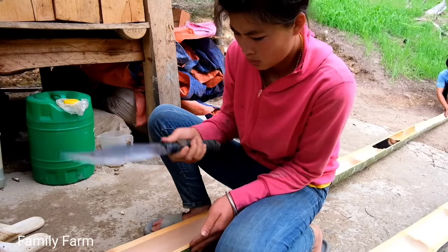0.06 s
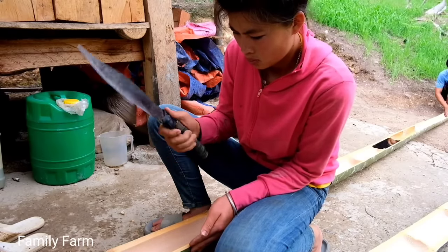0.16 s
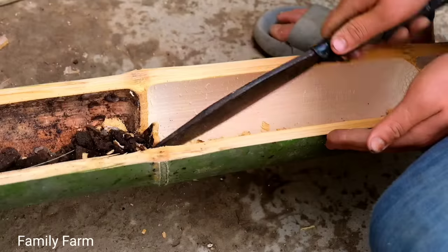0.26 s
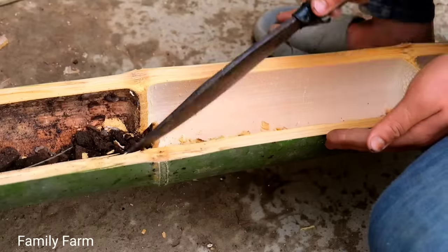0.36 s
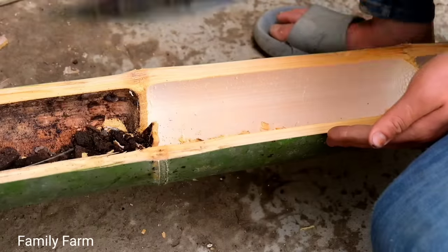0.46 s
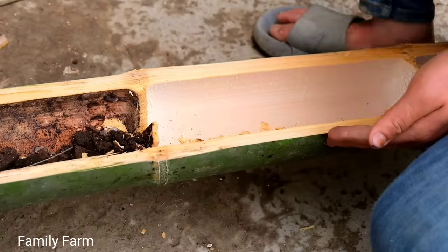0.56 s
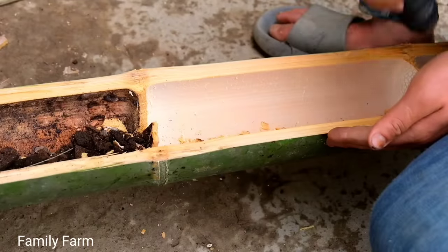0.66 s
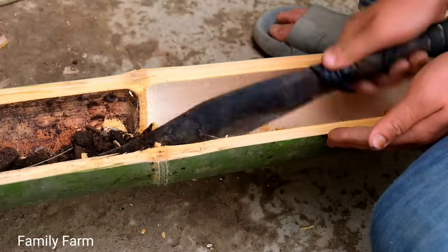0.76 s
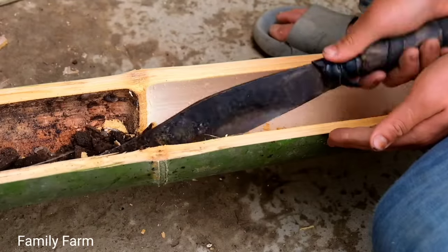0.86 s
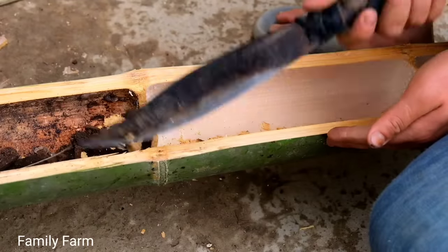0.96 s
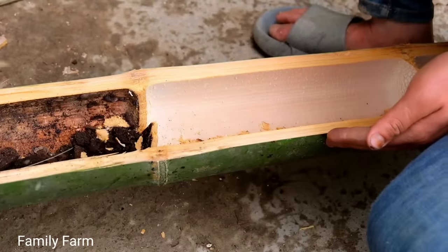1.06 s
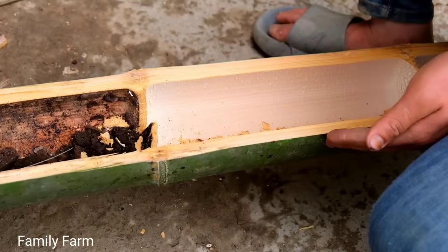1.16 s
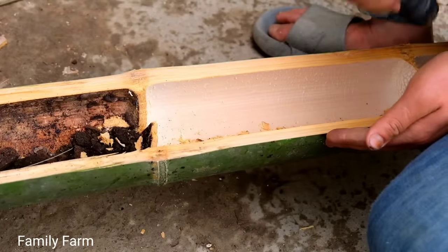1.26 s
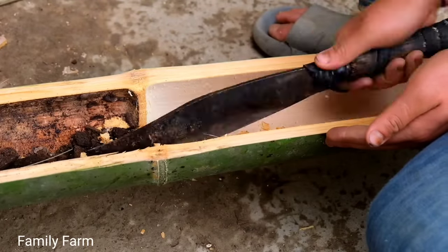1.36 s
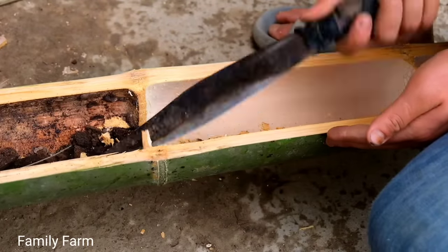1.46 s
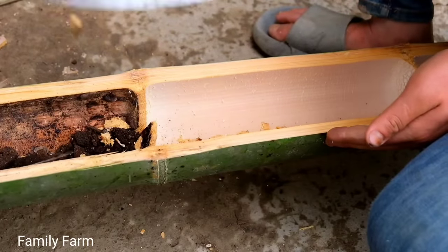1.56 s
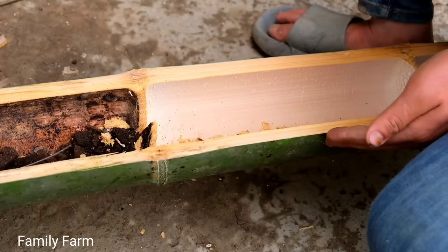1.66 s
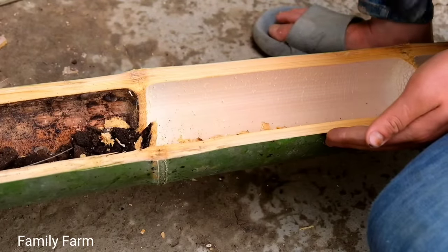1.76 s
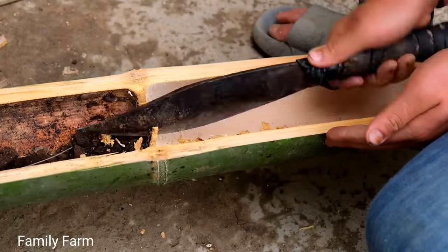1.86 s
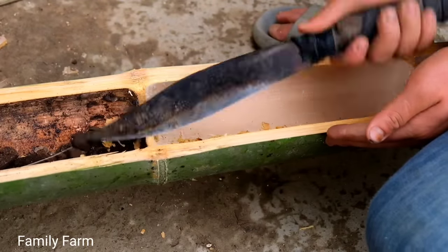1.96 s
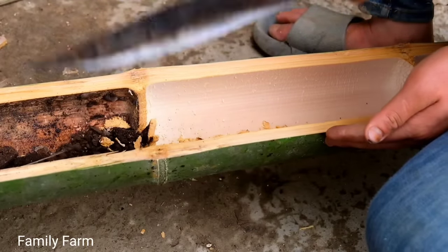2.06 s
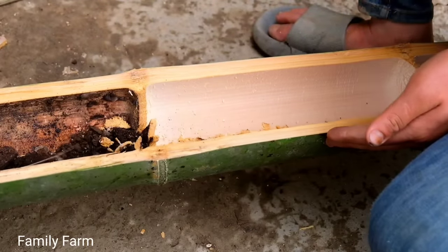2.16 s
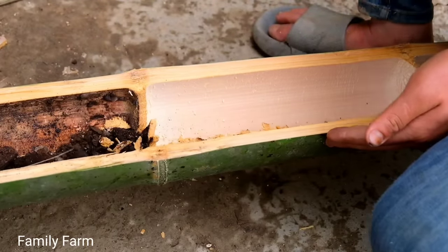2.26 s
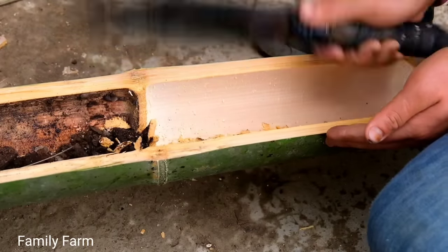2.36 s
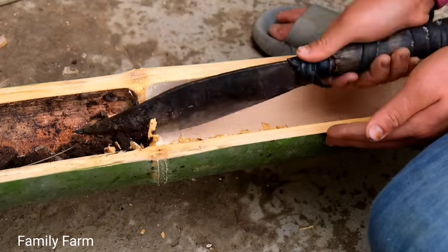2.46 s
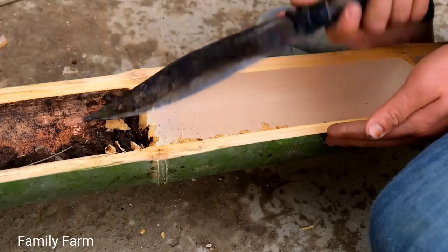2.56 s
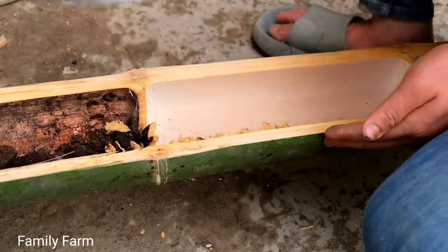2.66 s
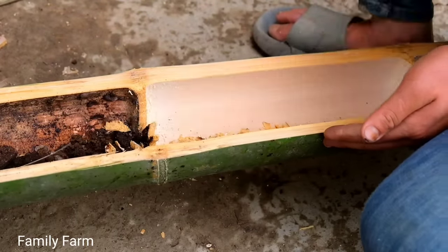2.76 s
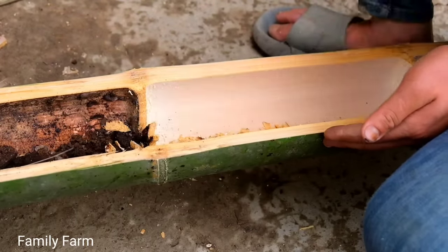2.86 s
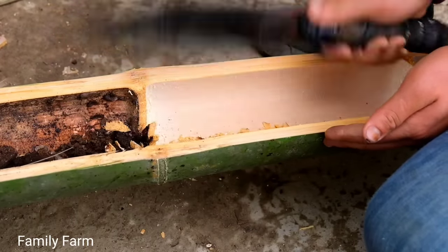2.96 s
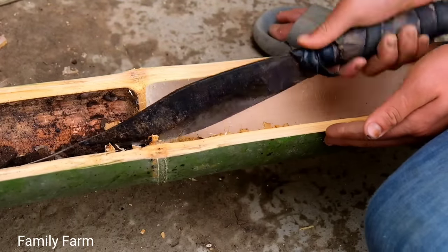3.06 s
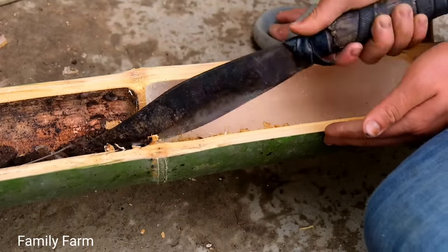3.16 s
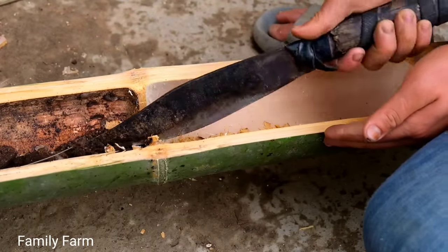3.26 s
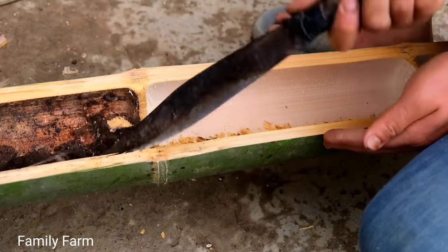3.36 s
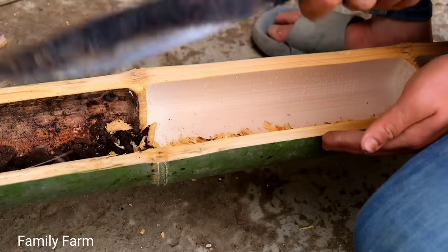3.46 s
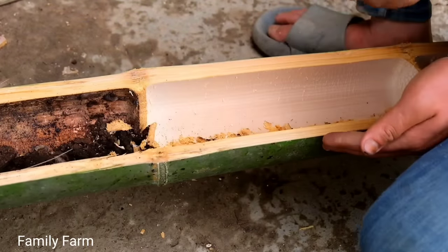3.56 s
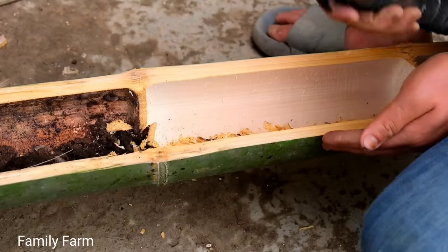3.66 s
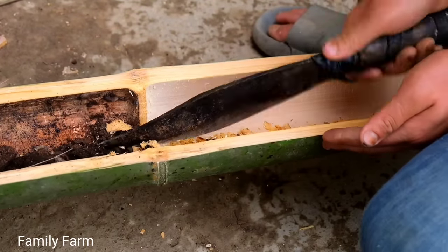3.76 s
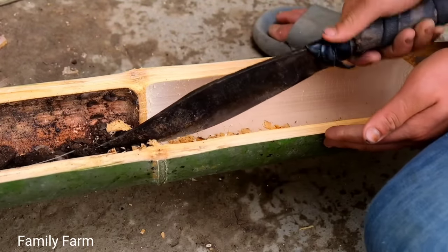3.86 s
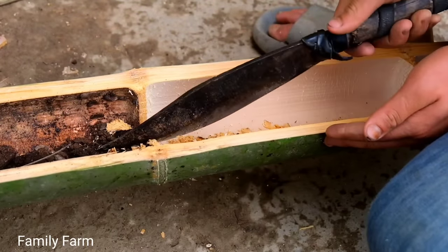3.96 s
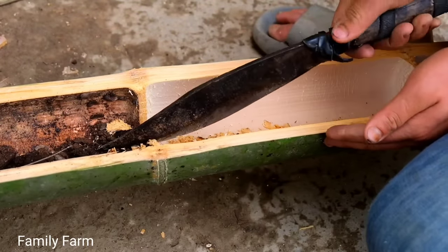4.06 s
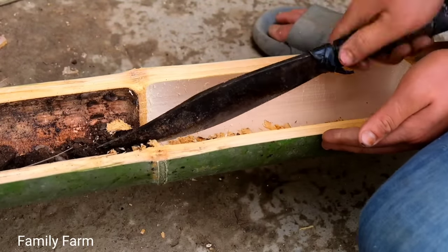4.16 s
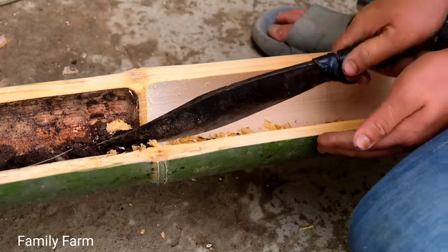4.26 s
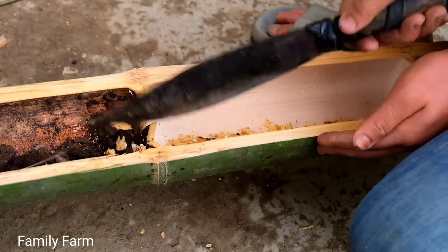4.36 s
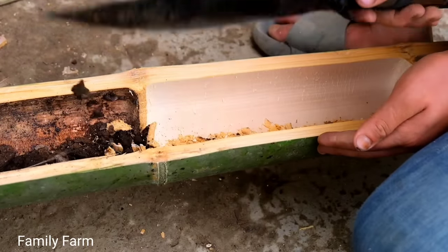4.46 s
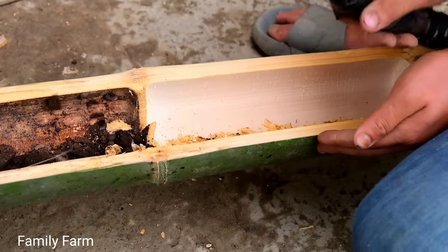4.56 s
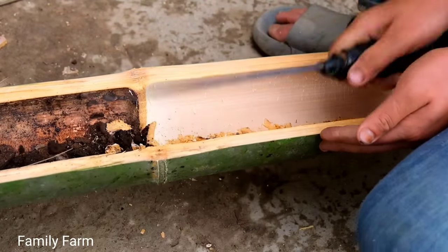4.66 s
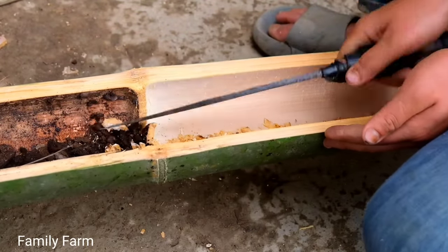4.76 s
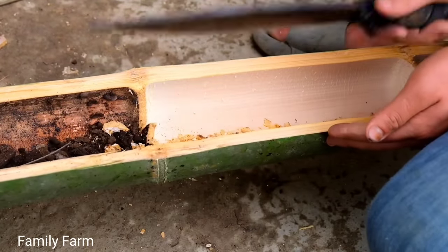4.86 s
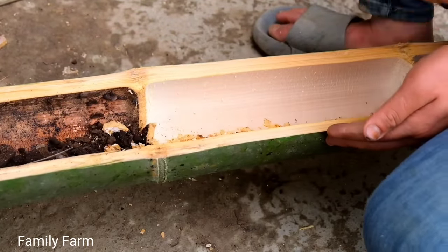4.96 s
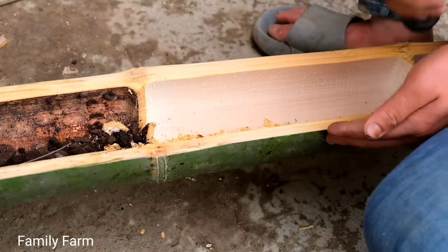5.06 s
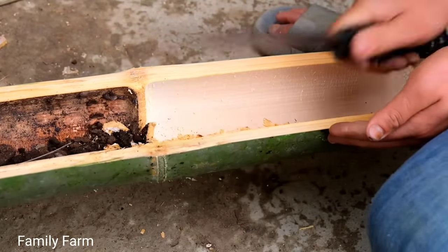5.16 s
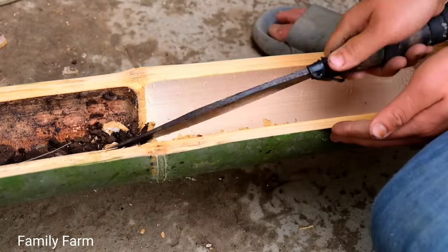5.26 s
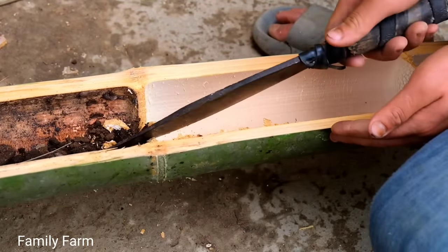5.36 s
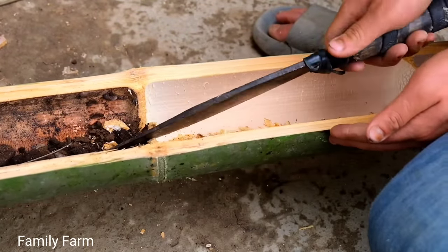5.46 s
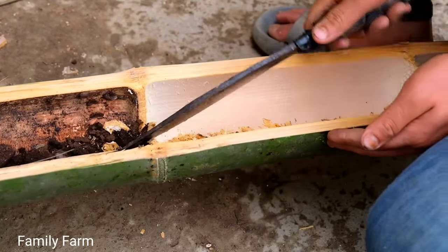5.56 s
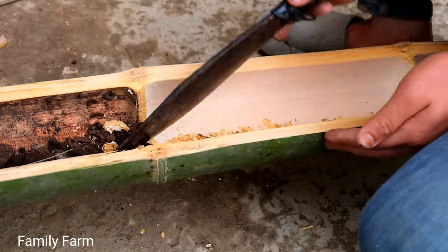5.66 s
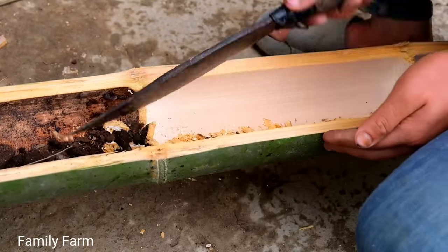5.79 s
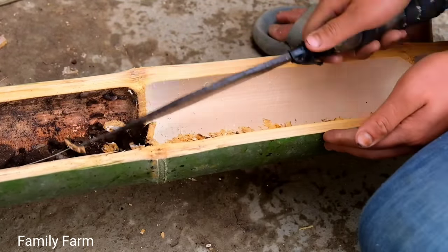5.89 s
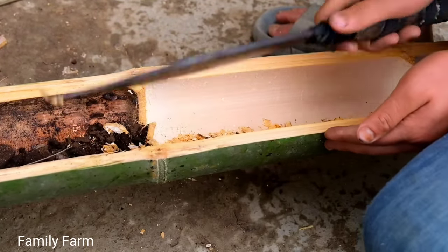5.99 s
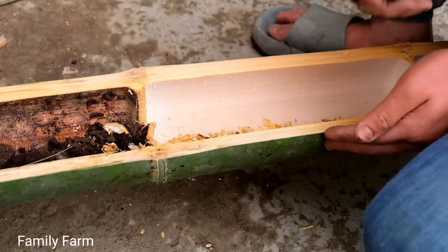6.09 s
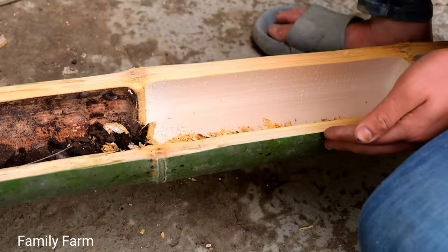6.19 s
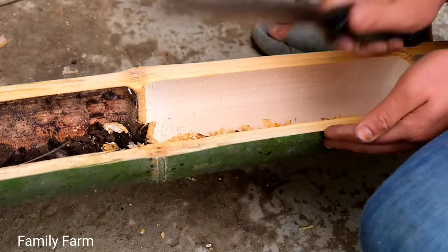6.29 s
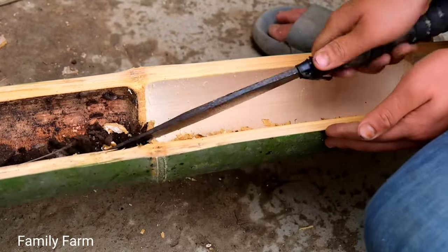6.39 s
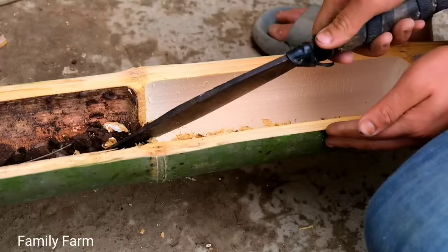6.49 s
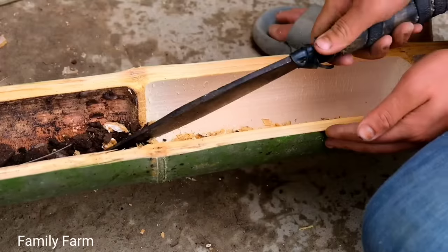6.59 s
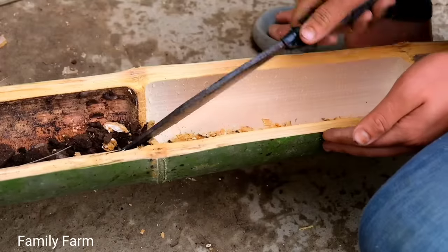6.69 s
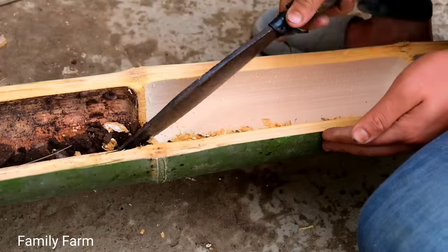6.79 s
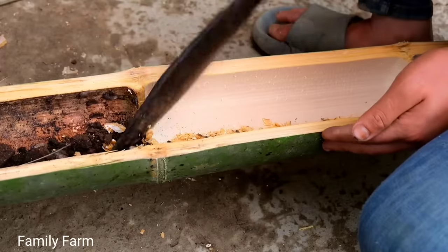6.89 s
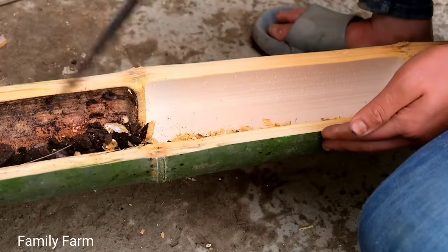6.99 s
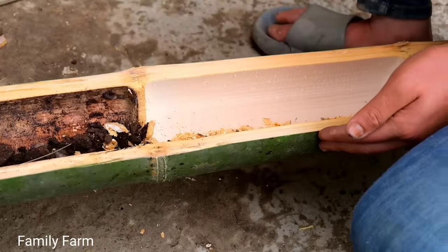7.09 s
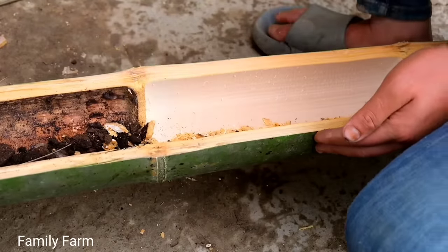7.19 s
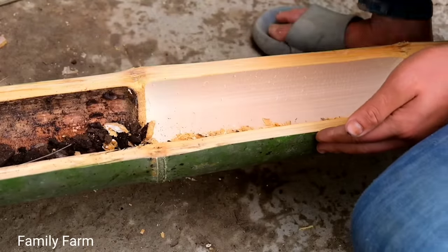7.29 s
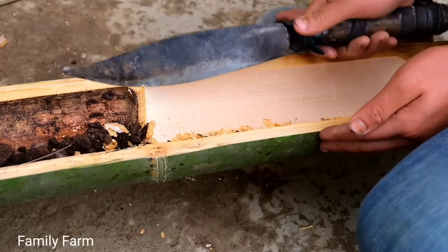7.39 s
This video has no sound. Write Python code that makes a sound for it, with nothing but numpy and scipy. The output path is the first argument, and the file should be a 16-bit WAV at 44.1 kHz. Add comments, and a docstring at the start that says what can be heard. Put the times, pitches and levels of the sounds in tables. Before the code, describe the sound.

Close microphone in an open concrete yard: insect hiss and soft air, a short scrape, then sharp bamboo chops with crisp fibre cracks, a low ground thud and slight steel ring. A second knife hacks farther away, crunchier and duller, with a short echo. Light ticks, hollow taps and rasps fill the gaps. A hoarse little bird run comes after four seconds, then chopping continues more sparsely.

```python
"""Insects hiss in open air from the start; the level begins low and quickly recovers.
A blade scrapes in a bamboo trough, then a second knife farther off hacks at its own pace.
Soon a heavy knife chops a bamboo pole on a concrete yard, loud enough to overload the microphone;
chips patter after each chop and the blade taps between them. Later a small bird gives a run of chirps.
Knocks are dying tones, cracks and hisses are shaped noise; gain control ducks the sound after each blow."""
import sys
import numpy as np
from scipy import signal
from scipy.fft import rfft, irfft
from scipy.io import wavfile
from scipy.ndimage import uniform_filter1d, map_coordinates

SR = 44100
rng = np.random.default_rng(int(sys.argv[2]) if len(sys.argv) > 2 else 0)


def pcm_store(signal):
    """Save signal as 16-bit PCM."""
    levels = np.round(np.clip(np.atleast_2d(signal), -1, 1) * 32767)
    wavfile.write(sys.argv[1], SR, levels.astype(np.int16).T)


N = 327663
T = np.arange(SR // 3) / SR  # time within one blow, in seconds

# All event and mode levels below are relative: each layer adds its own gain.
# Near chops: start_s, force_db, bite_db (into hard fibre), thud_db (on the ground),
# hollow_db (of the trough), knock_hz, crack_hz
NEAR_CHOPS = [(0.8071, -18.5, 4, -2.5, 3, 716, 2030), (1.383, -18.5, 3, -16, 4, 743, 2167),
              (1.897, -19.5, 9, -2, -11, 762, 1431), (2.449, -15.5, 0.5, -0.5, 5.5, 767, 1273),
              (3.0329, -13, -1, -7, -2, 772, 2184), (3.8131, -15, -11, -2, -2.5, 865, 1860),
              (4.7517, -31.5, -3, -3, 6, 780, 1230), (5.245, -15, -2, -2, -2.5, 925, 1500),
              (6.388, -16, -3.5, -2.5, 0, 876, 1670)]
# Second knife: start_s, force_db, bite_db, knock_hz
FAR_CHOPS = [(0.36, -25, -1, 529), (0.835, -31, 7.5, 654), (1.527, -24, -5, 557), (2.116, -21.5, -1.5, 573),
             (2.651, -25.5, 0, 723), (3.273, -27.5, 4, 730), (3.854, -26.5, -3, 726),
             (4.323, -23.5, -12, 753), (4.789, -25.5, -19, 690), (5.509, -25.5, -11, 688),
             (6.252, -28, 1.5, 537), (6.895, -25, 2.5, 947)]
# Light touches and bounces of the blade: start_s, force_db, hardness_db, knock_hz, free_ring (0 to 1)
BLADE_TAPS = [(0.974, -50, -5.5, 680, 0), (1.1263, -46.5, -14, 845, 0.23), (1.465, -54.5, 9.5, 430, 0.07),
              (1.978, -54.5, 7.5, 710, 0.8), (1.997, -41, -2.5, 1455, 0.04), (2.588, -33.5, -6, 450, 0.4),
              (2.601, -36, -2, 426, 0.82), (2.906, -62, -21.5, 473, .1), (3.367, -45, 3.5, 625, 0.45),
              (3.4264, -33.5, -9.5, 434, .06), (4.761, -30, -11.5, 875, 0.1), (4.935, -48, -12, 708, .1),
              (5.095, -55.5, -10.5, 704, .1), (5.676, -47.5, -4.5, 622, .7), (5.893, -35, -9, 447, .9),
              (5.978, -34.5, -8.5, 431, .01), (6.532, -39.5, -6, 974, 0), (6.731, -47.5, -1.5, 870, .25),
              (6.795, -55.5, 2.5, 960, 0.44), (7.042, -34, 1.5, 433, 0.14)]
# Blade dragged along the trough, and last a short knock at 6.55 s: peak_s (hardest pressure), swell_s, fade_s,
# pressure_db, rasp_db
SCRAPE_STROKES = [(0.281, 0.043, 0.021, -37, -45), (0.342, 0.032, 0.019, -40.5, -9),
                  (2.592, .018, 0.026, -24.5, -2.5), (4.94, 0.057, .06, -33.5, -6),
                  (5.664, 0.021, 0.052, -43, -3), (5.78, .08, 0.14, -53.5, 11.5),
                  (5.84, .1, .08, -33.5, -13), (6.382, .04, .005, -31.5, -10),
                  (6.552, 0.034, 0.038, -37, -15)]

# Ringing modes, all with columns: pitch_hz, level_db, t60_s (time to fall by 60 dB)
# Lasting ring of the bamboo pole
POLE_MODES = [(437.3, 0, 0.09), (540, -0.5, 0.046), (712, -4, 0.2), (877, -9, 0.0884), (1026, -13, 0.17),
              (1140, -15, 0.061), (1240, -9, 0.2), (1360, -15.5, .08), (1750, -9.5, 0.17),
              (2140, -17, 0.061), (2900, -19, 0.25), (3700, -18.5, .09), (5130, -17, 0.089)]
# Lasting ring of the steel blade
BLADE_MODES = [(9232, -20, .08), (11042, 0, .12), (11070, -21, .3), (13700, -10, .08), (13790, -16, .12),
               (15500, -20, .07)]
# The trough's short first answer to a hard blow
TROUGH_MODES = [(431.2, -10, 0.082), (563, 1, 0.034)]
# Quickly damped modes of the edge and of the stiff fibres it enters
FIBRE_MODES = [(2934, -4, 0.025), (3710, -5.5, .02), (4630, -0.5, 0.024), (5205, -1.5, 0.029),
               (6530, -6.5, 0.014), (8700, -7.5, 0.012), (9100, -3.5, 0.017), (11130, 2.5, 0.017),
               (11350, -4.5, .02), (13400, -3, 0.016)]

# Noise colours, all with columns: pitch_hz, level_db (per Hz, relative)
# Hollow body of the bamboo
BODY_COLOUR = [(30, -52.5), (100, -27), (160, -7), (280, -18.5), (430, 1.5), (700, 3.5), (950, -0.5),
               (1250, -5.5), (2500, -51.5)]
# Cracking fibres
CRACK_COLOUR = [(500, -26), (1000, -11.5), (1300, -4), (2100, 1.5), (2400, -3), (3100, -5), (4000, -16.5),
                (7000, -45.5)]
# Bright splinters
SPLINTER_COLOUR = [(2000, -13), (3800, 1), (5100, 7), (7000, -4.5), (9000, -5), (12000, -8.5),
                   (15500, -12.5)]
# Crumbs, ticks and fine grit
GRIT_COLOUR = [(2000, -9), (3800, -1), (5500, -5), (8000, -8), (11000, -17.5), (14500, -21.5), (16000, -29)]
# Edge rasping over fibres
RASP_COLOUR = [(900, -14), (1800, -2.5), (3300, -4), (6000, -7), (9000, -10), (14000, -15), (16000, -35)]
# Pole thudding on the ground
THUD_COLOUR = [(60, -44.5), (140, -17.5), (220, -4), (310, -1), (400, -4.5), (600, -37)]
# Dull body of the far pole
DULL_COLOUR = [(30, -53), (100, -42.5), (150, -11), (220, -16), (320, -13), (430, -5.5), (540, -1.5),
               (700, -8), (950, -6.5), (1250, -12), (2500, -59)]
# Bamboo wall where it is hit
WALL_COLOUR = [(400, -34), (620, 2), (720, 2), (830, -2), (980, -2), (1150, -4), (1600, -39)]
# Open country air
AIR_COLOUR = [(20, -34.5), (60, -3), (120, -6), (250, -3.5), (450, 0.5), (1000, -1), (1600, -5.5),
              (2300, -6.5), (3300, -11.5), (5000, -39.5)]
# Insect chorus
INSECT_COLOUR = [(1760, -33), (3000, -15.5), (3680, -12), (4630, -4), (5180, -5), (5800, -1.5), (6570, -6),
                 (7560, 0.5), (8400, -5.5), (8760, -15), (10400, -15), (11500, -25), (14500, -23),
                 (15300, -33), (16000, -41.5)]

# How alike left and right are: pitch_hz, likeness (1 = the same)
LEFT_RIGHT_LIKENESS = [(60, 1), (400, 1), (700, 0.99), (1300, 0.78), (2400, 0.63), (4400, 0.048),
                       (15000, 0.28)]
# How long the yard echoes: pitch_hz, t60_s
YARD_DECAY = [(150, 0.1), (500, 0.2), (1000, .26), (2500, 0.26), (6000, 0.47), (14000, 0.12)]

# A deeper bite cracks more and rings the steel more (dB per dB of bite)
CRACK_PER_BITE, STEEL_PER_BITE, FAR_CRACK_PER_BITE = 0.45, 2.2, 0.14
# A blow that does not drive the pole into the ground springs off and rings more (dB per dB of thud)
STEEL_PER_THUD = -0.31
# A far spot that knocks higher is stiffer and has less body
MID_KNOCK_HZ, BODY_DB_PER_OCTAVE = 690, -3
CRUNCH_LEAD_S = 0.007  # the far crunch comes this long before its knock
SCRAPE_RANGE_DB = 21.5  # a stroke begins and ends this far under its peak
CHIRP_START_S, CHIRP_EVERY_S, CHIRP_COUNT, CHIRP_DB = 4.011, 0.086, 8, -52.5
EDGE_HZ = 16200  # top of the final sound band


def amp(db):
    """Turns decibels into a gain."""
    return 10 ** (np.asarray(db) / 20)


def unit(x):
    """Scales a signal to rms 1."""
    return x / np.sqrt(np.mean(x ** 2) + 1e-20)


def read(points, hz):
    """Reads between table points on a logarithmic pitch axis."""
    table_hz, value = np.transpose(points)
    return np.interp(np.log(hz + 1), np.log(table_hz + 1), value)


def add(mix, start_s, sound):
    """Lays a stereo sound into the mix, cut off at the end if need be."""
    part = mix[:, max(round(start_s * SR), 0):][:, :sound.shape[1]]
    part += sound[:, :part.shape[1]]


def port_angle(hz):
    """Half the phase angle between the two microphone ports."""
    return np.arccos(np.clip(read(LEFT_RIGHT_LIKENESS, hz), -1, 1)) / 2


def noise(colour, size, ripple_db=0, ripple_hz=260):
    """Coloured stereo noise of rms 1, mono in the bass, wide in the treble; ripple adds chance resonances."""
    hz = np.fft.rfftfreq(size, 1 / SR)
    ripple = map_coordinates(rng.standard_normal(400), [hz / ripple_hz], order=2, mode="wrap")
    gain = amp(read(colour, hz) + ripple_db * ripple)
    mid, side = rfft(rng.standard_normal((2, size))) * gain
    mid = mid * np.cos(port_angle(hz))
    side = side * np.sin(port_angle(hz))
    return unit(irfft([mid + side, mid - side], size))


def wander(per_s, size):
    """A smooth random curve of rms 1, with per_s random points each second."""
    knots = np.arange(size) * per_s / SR
    return unit(map_coordinates(rng.standard_normal(size // 20), [knots], order=2, mode="wrap"))


def burst(rise, t60, hold=0):
    """Loudness curve of a blow: it swells, holds, then dies away (all times in seconds)."""
    swell = 1 - np.exp(-T / rise)
    return swell * 1000 ** (-np.maximum(T - hold, 0) / t60)


def mode(hz, t60, rise=0.0027):
    """One damped vibration, its phase shifted in opposite ways at the two ports."""
    phase = np.array([[-1], [1]]) * port_angle(hz)
    return np.sin(2 * np.pi * hz * T + phase) * burst(rise, t60)


def ring(modes, rise=0.0021):
    """All modes of an object struck at once; where the blow lands decides how much each one gets."""
    place_db = 1.8 * rng.standard_normal(len(modes))
    out = np.zeros((2, len(T)))
    for (hz, level_db, t60), extra_db in zip(modes, place_db):
        out += amp(level_db + extra_db) * mode(hz, t60, rise)
    return out


def splintering(colour, rough_db, per_s):
    """Fibres give way bundle after bundle; every spot on the pole has its own resonances."""
    fibres = noise(colour, len(T), ripple_db=4)
    return fibres * unit(amp(rough_db * wander(per_s, len(T))))


def dulled(x, corner_hz):
    """A gentle loss of treble."""
    return signal.lfilter(*signal.butter(1, corner_hz, fs=SR), x)


def thinned(x, corner_hz):
    """Takes away the deepest bass."""
    return signal.sosfilt(signal.butter(2, corner_hz, "high", fs=SR, output="sos"), x)


def patchy(x, depth_db):
    """Narrow pitch bands swell and fade on their own."""
    bands = signal.stft(x, nperseg=1024)[2]
    patches = rng.standard_normal(bands.shape[1:])
    patches = uniform_filter1d(patches, size=7, axis=0)  # smooth over pitch
    patches = uniform_filter1d(patches, size=8, axis=1)  # smooth over time
    return signal.istft(bands * amp(depth_db * unit(patches)), nperseg=1024)[1][:, :N]


def background():
    """Open country air and an insect chorus, both noise that wavers in level."""
    air = amp(-53 + 0.58 * wander(per_s=9.4, size=N)) * noise(AIR_COLOUR, N)
    insects = amp(-54.5 + 2.2 * wander(per_s=14, size=N)) * noise(INSECT_COLOUR, N)
    return patchy(air + insects, depth_db=4)


def scrapes():
    """The tip sticks and slips under changing pressure; crumbs knock in the trough while the edge rasps."""
    out = np.zeros((2, N))
    for peak_s, swell, fade, pressure_db, rasp_db in SCRAPE_STROKES:
        t = np.arange(-round(swell * SR), round(fade * SR)) / SR
        size = len(t)
        drop_db = SCRAPE_RANGE_DB * np.maximum(-t / swell, t / fade)
        pressure = amp(pressure_db - drop_db) * signal.windows.tukey(size, 0.2)  # soft ends
        crumbs = unit(amp(3.8 * wander(per_s=150, size=size)))
        slips = unit(amp(2.4 * wander(per_s=740, size=size)))
        rumble = noise(BODY_COLOUR, size)
        rumble += amp(-2.5 + 0.35 * rasp_db) * noise(CRACK_COLOUR, size, ripple_db=3)
        rasp = amp(rasp_db + 2.5) * noise(RASP_COLOUR, size)
        add(out, peak_s - swell, pressure * (crumbs * rumble + slips * dulled(rasp, corner_hz=9060)))
    return out


def yard(x, delay=0.006, build=0.0045):
    """Scattered echoes from the shed and the ground, as fading noise with its own decay at each pitch."""
    flat = [(20, 0), (20000, 0)]
    hz, t, bands = signal.stft(noise(flat, SR // 2), SR, nperseg=256)
    fading = amp(-60 * t / read(YARD_DECAY, hz)[:, None])
    tail = signal.istft(bands * fading, SR, nperseg=256)[1]
    since_s = np.maximum(np.arange(tail.shape[1]) / SR - delay, 0)
    tail *= 1 - np.exp(-since_s / build)
    return signal.fftconvolve(x, tail / np.linalg.norm(tail[0]), axes=1)[:, :N]


def far_chops():
    """A crunch of fibres, then a dull, drawn-out knock as the blade stops."""
    out = np.zeros((2, N))
    for start_s, force_db, bite_db, knock_hz in FAR_CHOPS:
        weight = amp(BODY_DB_PER_OCTAVE * np.log2(knock_hz / MID_KNOCK_HZ))
        cracking = amp(FAR_CRACK_PER_BITE * bite_db)
        knock = amp(16.5) * mode(knock_hz, t60=0.042, rise=0.0015)
        knock += amp(-10.5) * mode(hz=1042, t60=0.15)  # the far pole's lingering note
        wall = amp(1) * noise(WALL_COLOUR, len(T)) * burst(rise=0.0006, t60=0.14, hold=0.0033)
        body = amp(3) * noise(DULL_COLOUR, len(T)) * burst(rise=0.00074, t60=0.12, hold=0.0058)
        body += amp(-14.5) * ring(POLE_MODES)
        stop = amp(3.5) * splintering(CRACK_COLOUR, rough_db=-0.5, per_s=1100)
        stop *= burst(rise=0.0011, t60=0.03, hold=0.004)
        crack = amp(-1.5) * splintering(CRACK_COLOUR, rough_db=2.5, per_s=440)
        crack *= burst(rise=0.0021, t60=0.16, hold=0.0097)
        splinters = amp(-5.5) * splintering(GRIT_COLOUR, rough_db=1.5, per_s=1600)
        splinters *= burst(rise=0.00089, t60=0.19, hold=0.017)
        blow = knock + wall + weight * body + cracking * stop
        crunch = cracking * crack + amp(bite_db) * dulled(splinters, corner_hz=7000)
        add(out, start_s, amp(force_db) * blow)
        add(out, start_s - CRUNCH_LEAD_S, amp(force_db) * crunch)
    return out


def chops():
    """The edge bites: fibres crack, the wall knocks, the pole thuds on the ground, the steel rings."""
    out = np.zeros((2, N))
    for start_s, force_db, bite_db, thud_db, hollow_db, knock_hz, crack_hz in NEAR_CHOPS:
        thud = -amp(19.5) * mode(hz=302, t60=0.016, rise=0.0008)  # minus: the ground pushes back
        thud += amp(-4.5) * noise(THUD_COLOUR, len(T)) * burst(rise=0.0015, t60=0.023, hold=0.005)
        trough = amp(10.5) * ring(TROUGH_MODES, rise=0.00078) + amp(-9) * ring(POLE_MODES)
        knock = amp(17) * mode(knock_hz, t60=0.026, rise=0.00066)
        knock += amp(2.5) * noise(WALL_COLOUR, len(T)) * burst(rise=0.00013, t60=0.024, hold=0.0067)
        crack = amp(8.5) * splintering(CRACK_COLOUR, rough_db=2.5, per_s=810)
        crack *= burst(rise=0.0004, t60=0.022, hold=0.0035)
        crack += amp(11) * mode(crack_hz, t60=0.022, rise=0.00061)
        splinters = amp(11) * splintering(SPLINTER_COLOUR, rough_db=1, per_s=1400)
        splinters *= burst(rise=0.0005, t60=0.016, hold=0.0022)
        splinters += amp(6.5) * ring(FIBRE_MODES)
        steel = amp(-17.5 + STEEL_PER_THUD * thud_db) * ring(BLADE_MODES)
        blow = knock + amp(thud_db) * thud + amp(hollow_db) * trough
        blow += amp(CRACK_PER_BITE * bite_db) * crack
        blow += amp(bite_db) * splinters
        blow += amp(STEEL_PER_BITE * bite_db) * steel
        add(out, start_s, amp(force_db) * blow)
    return thinned(out, corner_hz=174)


def chips():
    """Crumbs and splinters patter into the trough with each near chop, as rough grains of noise."""
    out = np.zeros((2, N))
    for start_s, force_db, bite_db, *_ in NEAR_CHOPS:
        grains = splintering(GRIT_COLOUR, rough_db=4, per_s=400)
        patter = grains * burst(rise=0.01, t60=0.082, hold=0.022)
        add(out, start_s, amp(force_db + CRACK_PER_BITE * bite_db - 18) * patter)
    return out


def taps():
    """The blade touches the trough or flicks a chip: hard touches tick, soft ones ring the hollow pole."""
    out = np.zeros((2, N))
    for start_s, force_db, hard_db, knock_hz, free_ring in BLADE_TAPS:
        knock = amp(7.5) * mode(knock_hz, t60=0.066) + amp(-8.5) * ring(POLE_MODES)
        body = amp(-3.5) * noise(BODY_COLOUR, len(T)) * burst(rise=0.00037, t60=0.12, hold=0.0013)
        crack = amp(3) * splintering(CRACK_COLOUR, rough_db=2.5, per_s=1200)
        crack *= burst(rise=0.00035, t60=0.021, hold=0.0018)
        tick = amp(14.5) * splintering(GRIT_COLOUR, rough_db=0, per_s=1900)
        tick *= burst(rise=0.0004, t60=0.055, hold=0.003)
        steel = free_ring * amp(13) * ring(BLADE_MODES)
        touch = amp(-hard_db) * (knock + body) + crack + amp(hard_db) * (tick + steel)
        add(out, start_s, amp(force_db) * touch)
    return out


def bird(low_hz=3800, high_hz=5000, whistle_hz=7000, whistle_db=-4):
    """An even run of upward chirps, hoarse from a shaky pitch, each with a thin whistle above it."""
    length_s, hoarseness, waver = 0.075, 0.075, 0.025  # the last two are shares of the pitch
    out = np.zeros((2, N))
    t = np.arange(round(length_s * SR)) / SR
    for k in range(CHIRP_COUNT):
        sweep_hz = low_hz + (high_hz - low_hz) * t / length_s
        sweep_hz *= 1 + hoarseness * wander(per_s=730, size=len(t))
        thin_hz = whistle_hz * (1 + waver * wander(per_s=740, size=len(t)))
        chirp = np.sin(2 * np.pi * np.cumsum(sweep_hz) / SR)
        chirp += amp(whistle_db) * np.sin(2 * np.pi * np.cumsum(thin_hz) / SR)
        swell = np.sin(np.pi * t / length_s)
        add(out, CHIRP_START_S + k * CHIRP_EVERY_S, amp(CHIRP_DB) * chirp[None] * swell)
    return out


def scene():
    """Mixes all sources; the far knife and the bird send more of their sound into the yard."""
    touches = scrapes() + chips() + taps()
    far, near, song = far_chops(), chops(), bird()
    to_yard = amp(-19.5) * dulled(near, corner_hz=1510) + amp(-12.5) * far
    to_yard += amp(-14.5) * touches + amp(-5) * song
    return background() + touches + far + near + song + yard(to_yard)


def record(dry, threshold_db=-45, most_db=18, recover_db_per_s=68, lag=0.023,
           bass_share=0.26, split_hz=2200, start_db=13):
    """Gain control turns down late after each blow, most in the treble; peaks clip; the top is cut off."""
    power = uniform_filter1d((dry ** 2).mean(0), size=400, origin=199)  # mean of the last 400 samples
    power_db = 10 * np.log10(abs(power) + 1e-12)
    fall = np.arange(N) * recover_db_per_s / SR
    over_db = np.clip(power_db - threshold_db, 0, most_db)
    over_db = np.maximum.accumulate(over_db + fall) - fall  # jumps up, recovers steadily
    over_db = np.maximum(over_db, start_db - fall)  # the gain starts low and recovers
    keep = np.exp(-1 / (lag * SR))  # lag in seconds
    duck_db = start_db + signal.lfilter([1 - keep], [1, -keep], over_db - start_db)
    bass = signal.filtfilt(*signal.butter(2, split_hz, fs=SR), dry)
    treble = dry - bass
    ducked = bass * amp(-bass_share * duck_db) + treble * amp(-duck_db)
    clipped = ducked / (1 + ducked ** 6) ** (1 / 6)  # rounded limit at full scale
    band_limit = signal.firwin(255, EDGE_HZ, window=("kaiser", 8), fs=SR)
    return signal.oaconvolve(clipped, band_limit[None], "same")


dry = scene()
out = record(dry)
pcm_store(out)
```